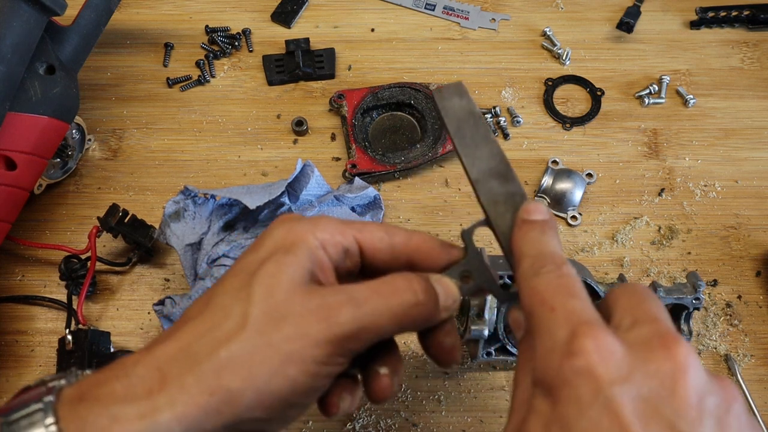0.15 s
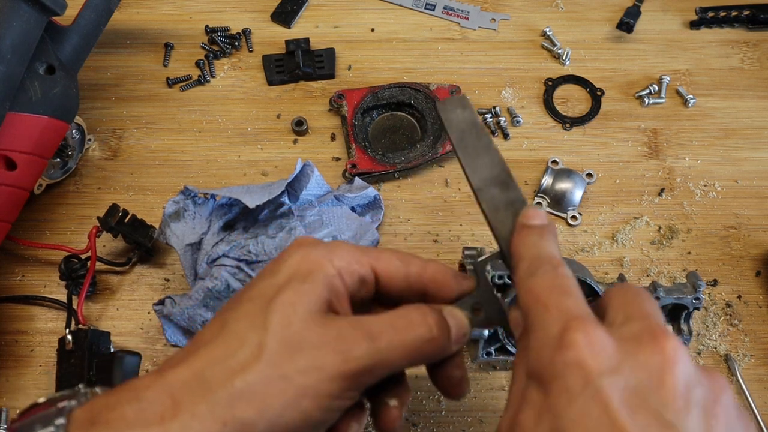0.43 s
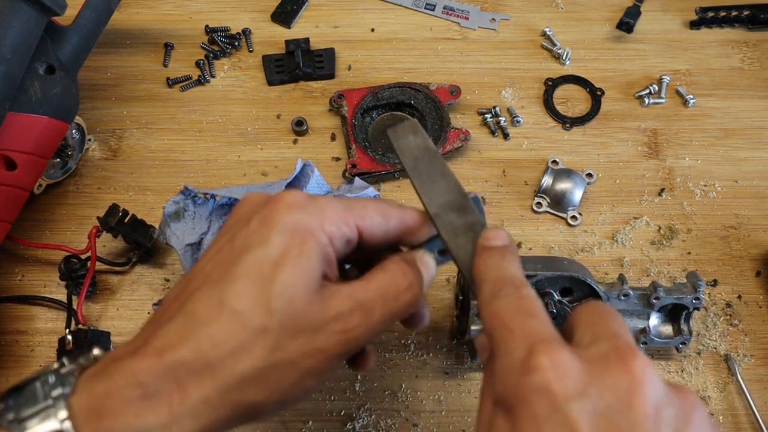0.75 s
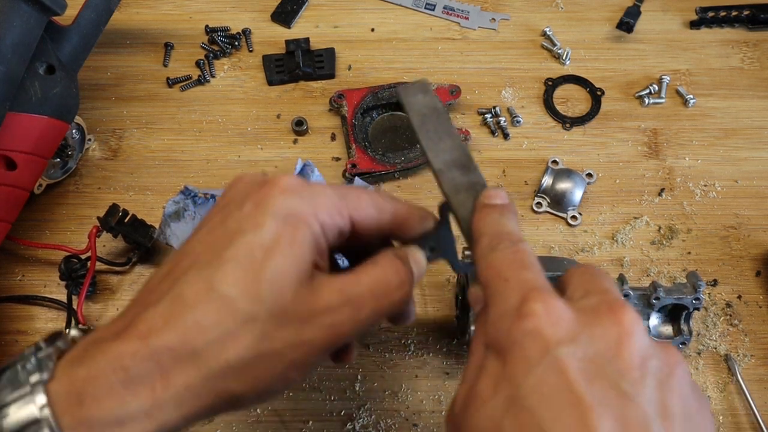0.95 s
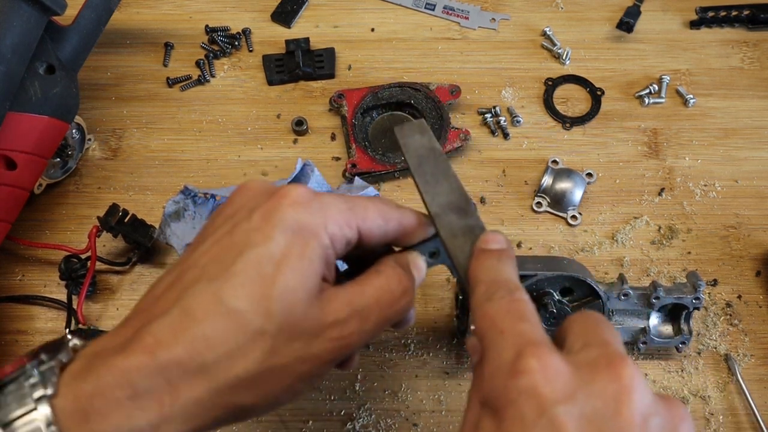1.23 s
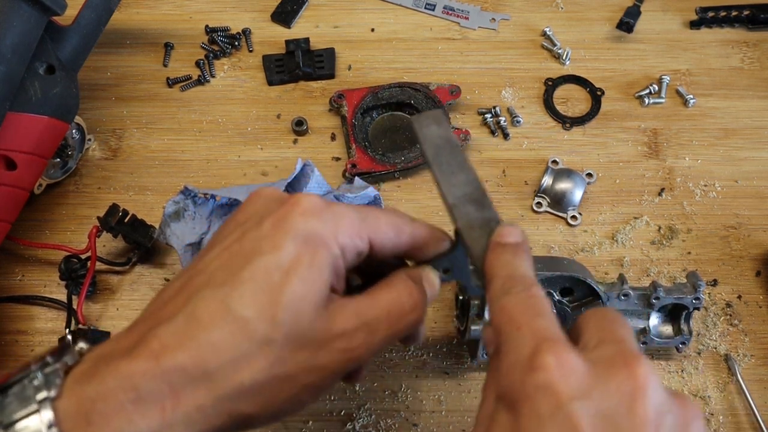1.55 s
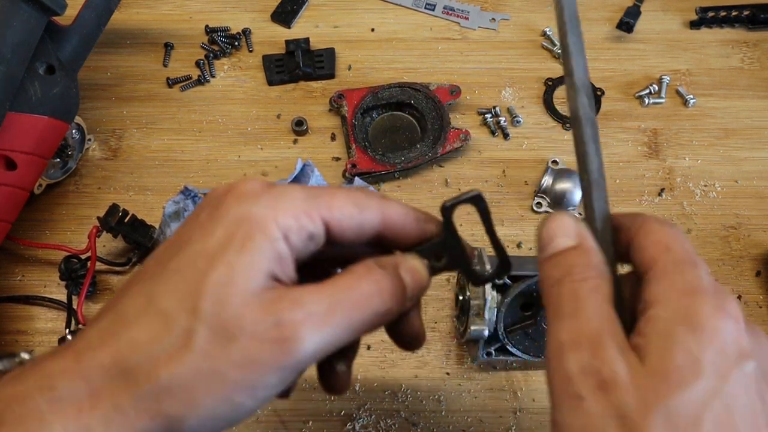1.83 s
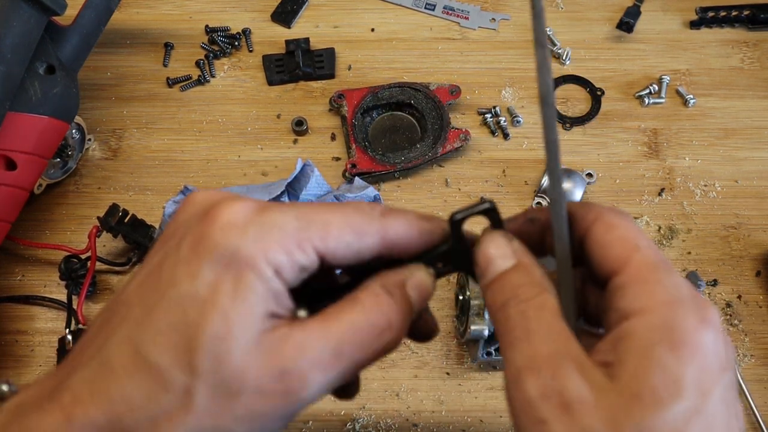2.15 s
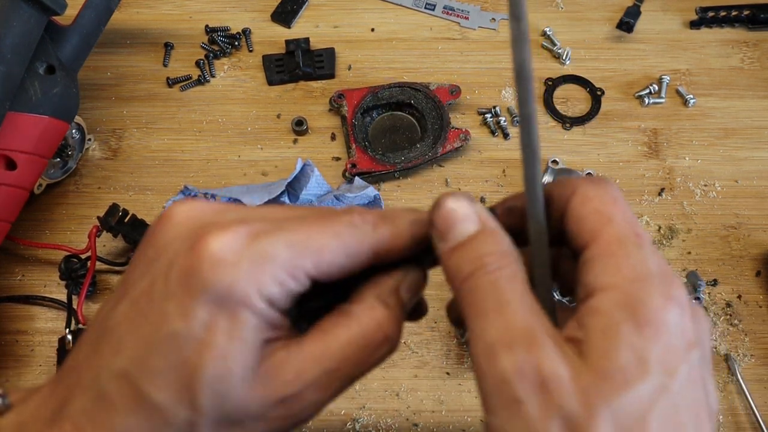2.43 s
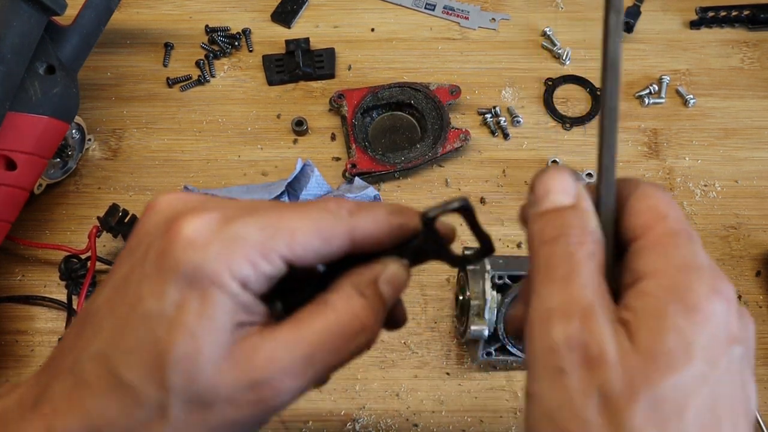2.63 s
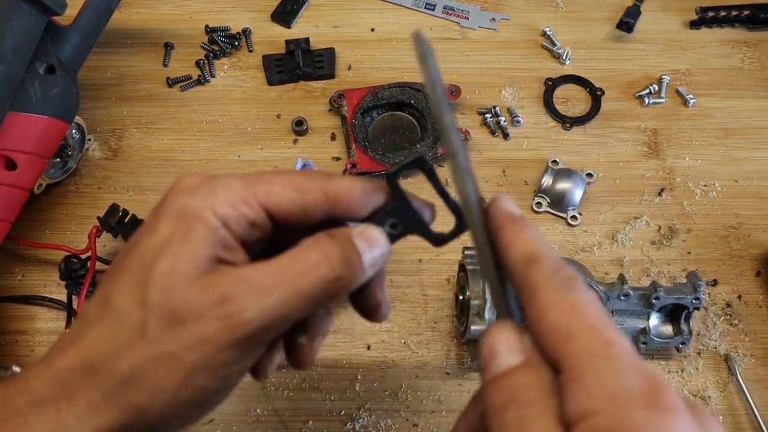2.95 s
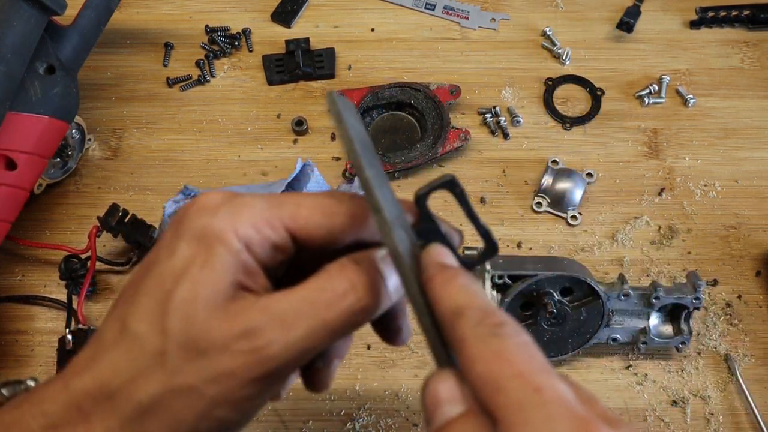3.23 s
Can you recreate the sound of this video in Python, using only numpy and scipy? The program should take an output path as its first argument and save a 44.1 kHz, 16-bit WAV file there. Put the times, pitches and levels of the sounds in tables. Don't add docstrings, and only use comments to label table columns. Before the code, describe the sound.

Close, dry filing at a workbench: about ten quick gritty scrapes with shifting metallic ringing, a small double tap between them, then near silence and a short clicking slide, in a small room.

```python
import sys
import numpy as np
from scipy import signal
from scipy.io import wavfile
from scipy.ndimage import uniform_filter1d

SR = 44100
rng = np.random.default_rng(int(sys.argv[2]) if len(sys.argv) > 2 else 0)


def output_pcm(signal):
    pcm = np.clip(np.atleast_2d(signal).T, -1, 1) * 32767
    wavfile.write(sys.argv[1], SR, np.round(pcm).astype(np.int16))


def boost(x):
    u = np.asarray(x, float) / 20
    return 10 ** u


N = 149940


def evened(x):
    return x / np.sqrt(np.mean(x ** 2) + 1e-20)


def read(points, hz):
    f, value = np.transpose(points)
    return np.interp(np.log(hz + 1), np.log(f + 1), value)


def add(mix, s, sound):
    part = mix[round(s * SR):][:len(sound)]
    part += sound[:len(part)]


def ring(x, hz, width):
    r = np.exp(-np.pi * 1.5 * width / SR)
    turn = 2 * np.pi * min(hz, 0.45 * SR) / SR
    one = [1 - r, 0, r - 1, 1, -2 * r * np.cos(turn), r * r]
    return signal.sosfilt([one, one], x)


def floor():
    # frequency in Hz, density in dB per Hz.
    spectrum = [(15, -14.5), (30, -0.5), (120, 0), (300, -3), (700, -5), (1400, -3), (2000, -12),
                (16000, -16.5)]
    floor_db, patch_db = -55.5, 0.27
    frames, hz = N // 256 + 5, np.fft.rfftfreq(1024, 1 / SR)
    a, b, patches = rng.standard_normal((frames, 513, 3)).T
    patches = uniform_filter1d(patches, 10, 0)
    patches = evened(uniform_filter1d(patches, 14, 1))
    z = (a + 1j * b) * boost(read(spectrum, hz)[:, None] + patch_db * patches)
    hiss = signal.istft(z, nperseg=1024, noverlap=768)[1][:N]
    return boost(floor_db) * evened(hiss)


def room(x):
    # frequency in Hz, t60 in seconds.
    decay = [(300, 0.32), (2000, 0.39), (6000, 0.35), (14000, 0.23)]
    # frequency in Hz, level in dB.
    colour = [(300, -2), (1000, 0), (1800, -2.5), (3500, 1), (6000, -1), (12000, 3.5)]
    echoes = np.zeros(SR)
    at = np.arange(200, SR - 20, 20)
    echoes[at + rng.integers(0, 20, at.shape)] = rng.choice([-1., 1.], at.shape)
    hz, t, z = signal.stft(echoes, SR, nperseg=256)
    gain_db = read(colour, hz)[:, None] - 60 * t / read(decay, hz)[:, None]
    tail = signal.istft(z * boost(gain_db), SR, nperseg=256)[1]
    return signal.fftconvolve(x, tail / np.linalg.norm(tail))[:N]


def bump(s, db, hz, t60):
    t = np.arange(SR // 2) / SR
    wobble = ring(rng.standard_normal(len(t)), hz, 0.3 * hz)
    shape = np.minimum(t / 0.0028, 1) * boost(-60 * t / t60)
    thud = wobble * shape
    return s, boost(db) * thud * np.linalg.norm(shape) / np.linalg.norm(thud)


def all_modes(main, main_db, shapes, body, count):
    body_db, spread_db = -6.5, 3.5
    u = rng.random((count, 3))
    hz = 320 + 15600 * ((np.arange(count) + 0.5 * u[:, 0]) / count) ** 1.5
    db = read(body, hz) + body_db + spread_db * 2 * (u[:, 1] - 0.5)
    strong = np.c_[np.add(main, [0, 0, main_db]), shapes[:len(main)]]
    crowd = np.c_[hz, 60 + np.gradient(hz), db, u[:, 2]]
    return np.r_[strong, crowd]


def contact_bodies():
    # frequency in Hz, width in Hz, level in dB.
    bite = [(1340, 130, -9), (1750, 150, -6), (2450, 150, -3), (2950, 190, -4), (3750, 190, -3),
            (4330, 120, -3), (4830, 140, 0), (6150, 130, -4), (6580, 220, -3), (980, 120, -13),
            (8480, 110, -1), (8990, 130, -5), (9570, 80, -6), (13300, 90, -16)]
    drag = [(1280, 110, -6), (1740, 120, -5), (2200, 120, -1), (3070, 160, -1), (3800, 160, -3),
            (4690, 210, -3), (4290, 96, -4), (6170, 70, -6), (6520, 190, -6), (8200, 160, -10),
            (950, 130, -13), (9000, 100, -13), (9610, 78, -10), (15100, 130, -26)]
    held = [(400, 250, -18), (960, 140, -6), (1830, 300, 3), (2300, 200, -5), (3150, 170, -3),
            (3750, 300, -4), (4250, 260, -3), (5020, 200, -5), (6700, 300, -8), (8700, 500, -10),
            (10260, 250, -14)]
    tipped = [(600, 400, -14), (1650, 400, 5), (3030, 300, -2), (4330, 400, -1), (5090, 300, 1),
              (5750, 250, 0), (6630, 250, -3), (8450, 400, -6)]
    # frequency in Hz, level in dB.
    bite_body = [(330, -29.5), (620, -18.5), (2400, -5.5), (4790, -2.4), (7250, -6), (8700, -2.5),
                 (10800, -16.5), (14200, -17.5)]
    drag_body = [(330, -32.5), (620, -15), (1300, -15.5), (2230, -3), (4790, -7), (8410, -10.5),
                 (10800, -23), (15500, -31)]
    held_body = [(200, -30), (960, -14), (1830, -5), (4240, -3), (8490, -6), (11000, -17), (15800, -28)]
    bite_shape = [0.022, 0.48, 0.16, 0.067, 1, 0.1, 0.2, 0.47, 0.15, 0.37, .75, 0.23, 1, .35]
    drag_shape = [0.56, 0.64, 0.31, 1, 0.05, 0.48, 0.22, 0.4, 0.17, 0.77, 0.56, 0.53, 0.25, .55]
    main_db, loose_db = -5, 1
    return (all_modes(bite, main_db, bite_shape, bite_body, count=50),
            all_modes(drag, main_db, drag_shape, drag_body, count=50),
            all_modes(held, loose_db, bite_shape, held_body, count=40),
            all_modes(tipped, loose_db, bite_shape, held_body, count=40))


def steel(drive, place, tilt_db, modes):
    travel_turns, travel_db = 0.45, 5.5
    sides = np.sign(rng.random((len(drive), len(modes))) - 0.5).T
    out = 0
    for side, (hz, width, db, turns) in zip(sides, modes):
        shape = np.cos(2 * np.pi * (turns + travel_turns * np.sqrt(hz / 1000) * place))
        gain_db = db + travel_db * shape + tilt_db * np.log2(hz / 4000)
        out = out + ring(side * drive * boost(gain_db), hz, width)
    return out


def tap(s, db, tilt_db, modes):
    tap_db, rattle_s = -5, 0.0018
    t = np.arange(3000) / SR
    rattle = np.exp(-t / rattle_s) * (rng.random(len(t)) < 0.12)
    drive = rattle + 2 * (t == 0)
    sound = steel(drive, 0, tilt_db, modes)
    return s, boost(db + tap_db) * sound / np.std(sound[:200])


def sing(drive, t, start, length, hz, db):
    width_hz, sing_db = 135, -2
    swell = np.sin(np.pi * np.clip((t - start) / (1.2 * length) + 1 / 12, 0, 1)) ** 0.5
    sides = np.sign(rng.random(len(t)) - 0.5)
    tone = ring(drive * swell * sides, hz, width_hz)
    return boost(db + sing_db) * tone * np.linalg.norm(swell) / np.linalg.norm(tone)


def stroke(rows, begin, modes):
    # start in seconds,
    # length in seconds, frequency in Hz, level in dB.
    sings = [(0.0, 0.029, 4260, -20.5), (0.0, 0.035, 3010, -24.5), (0.078, 0.046, 5390, -21.5),
             (0.08, 0.075, 3060, -25.5), (0.099, 0.087, 3740, -22.5), (0.119, 0.067, 2440, -23.5),
             (0.119, 0.075, 9560, -19), (0.151, 0.075, 4790, -20.5), (0.293, 0.081, 2200, -29),
             (0.308, 0.073, 3700, -29), (0.351, 0.052, 4270, -25), (0.435, 0.055, 3050, -19),
             (0.454, 0.078, 8490, -17.5), (0.459, 0.058, 990, -28.5), (0.488, 0.049, 6710, -26),
             (0.504, 0.046, 4820, -23), (0.609, 0.046, 4860, -21.5), (0.678, 0.067, 3060, -27.5),
             (1.016, 0.081, 1380, -28.5), (1.02, 0.084, 2500, -19.5), (1.042, 0.049, 6580, -17),
             (1.045, 0.049, 8460, -16), (1.056, 0.049, 9030, -39), (1.068, 0.058, 4860, -21),
             (1.193, 0.078, 3970, -25), (1.205, 0.075, 4730, -23), (1.207, 0.084, 1300, -35),
             (1.216, 0.07, 2200, -21.5), (1.641, 0.049, 8410, -16), (1.64, 0.073, 1770, -24.0),
             (1.646, 0.081, 2750, -19.5), (1.652, 0.07, 5870, -23), (1.658, 0.081, 2490, -25.5),
             (1.66, 0.064, 6680, -30.5), (1.662, 0.081, 2750, -26), (1.666, 0.061, 9000, -24.0),
             (1.672, 0.064, 4790, -19.5), (1.681, 0.046, 3920, -17.5),
             (0.11, .11, 563, -38), (0.268, .07, 590, -33), (0.297, .09, 335, -41.5),
              (0.646, .08, 600, -37.5), (1.013, .12, 563, -35.5), (1.18, .09, 564, -41),
              (1.374, .09, 590, -35), (1.4, .08, 360, -42.5), (1.505, .1, 2330, -23),
              (1.51, .09, 1824, -27), (1.516, .08, 4000, -31), (1.38, .08, 2820, -28.5),
              (1.42, .06, 4150, -26.5)]
    teeth_per_s, tooth_spread_db = 6000, 2.4
    judder_db, judder_s, chatter_db = 1.8, 0.0018, 1.6
    land_s, lift_s = 0.0012, 0.005
    s, press_db, tilt_db = np.transpose(rows)
    first, last = s[0], s[-1]
    u, g = rng.random((9600, 2)), rng.standard_normal((9600, 2))
    t = first + np.arange(9600) / SR
    caught = u[:, 0] < teeth_per_s / SR
    teeth = caught * np.sign(g[:, 0]) * boost(-tooth_spread_db * np.log(u[:, 1] + 0.02))
    span = int(judder_s * SR) + 1
    judder = evened(uniform_filter1d(uniform_filter1d(g[:, 1], span), span))
    landing = np.clip((t - first) / land_s + (first == 0), 0, 1)
    lifting = np.clip((last + lift_s - t) / lift_s, 0, 1)
    place = begin + np.clip((t - first) / (last - first), 0, 1)
    drive = teeth * boost(judder_db * np.minimum(judder, 2)) * landing * lifting
    tilt = np.interp(t, s, tilt_db) + chatter_db * np.clip(judder, -2, 2)
    sound = steel(drive, place, tilt, modes)
    rasp = sound * boost(np.interp(t, s, press_db)) / np.std(sound[t < last])
    song = np.zeros(len(t))
    for start, length, hz, db in sings:
        if first < start + length / 2 < last:
            song += sing(drive, t, start, length, hz, db)
    return first, rasp, song


def scene():
    # time in seconds, pressure in dB, speed brightness in dB per octave.
    pushes = [
        [(0.088, -22, -2), (0.092, -17, -2), (0.174, -14, 0.5), (0.186, -18.5, -0.5), (0.215, -21, 1),
         (0.226, -38.5, -9.5)],
        [(0.444, -28, 0), (0.449, -16, -2), (0.48, -12.5, 0), (0.525, -11.5, 0.5), (0.538, -18, -2.5),
         (0.575, -38, 0)],
        [(1.009, -18, -2), (1.075, -12.5, -0.5), (1.133, -23, -1.5), (1.15, -61, -16.5)],
        [(1.374, -10, -2), (1.382, -14.5, -2.5), (1.402, -19, -1.5), (1.454, -18, -1), (1.485, -38.5, -0.5)],
        [(1.653, -9.5, -1), (1.705, -14.5, -1.5), (1.729, -11.5, 0), (1.737, -31.5, 4.5)],
    ]
    pulls = [
        [(0.0, -11.5, 2), (0.016, -20, 0), (0.03, -31.5, 0.5), (0.08, -42, -4)],
        [(0.275, -17.5, -3.5), (0.281, -16.5, 2), (0.361, -16.5, -1.5), (0.387, -21.5, -1), (0.393, -37, -10.5)],
        [(0.595, -30.5, -3.5), (0.637, -17, 0.5), (0.719, -20.5, -1.5), (0.735, -37, 1.5)],
        [(1.176, -25, -3), (1.244, -17, -0.5), (1.296, -21, -2.5), (1.31, -53, -3)],
        [(1.507, -18, -2.5), (1.512, -21.5, -1.5), (1.594, -23, -1.5), (1.603, -36, -2)],
    ]
    slides = [
        [(2.55, -69, 0), (2.578, -47.5, 5.5), (2.595, -57, 0), (2.674, -57.5, 4.5), (2.73, -79, 2.5)],
        [(3.14, -29, -2), (3.165, -39.5, -4), (3.2, -40, -2), (3.22, -38.5, -6.5), (3.226, -27.5, -1.5),
         (3.246, -33.5, 2.5), (3.252, -38, -8)],
    ]
    push_from = [0.037, 0.86, 0.04, 0.073, 0.15]
    pull_from = [1, 1, 0.23, 0.087, 0.23, 0.11, 0.049]
    # time in seconds, level in dB, brightness in dB per octave.
    taps = [
        (.7821, -17, 0),
        (.7878, -15, 0),
        (.815, -21, -1),
        (3.1338, -19, -2),
        (3.1375, -24, -2),
        (3.2296, -21, 0),
        (3.2385, -20, 0),
    ]
    # time in seconds, level in dB, frequency in Hz, t60 in seconds.
    bumps = [
        (.385, -46, 211, .25),
        (.385, -50.5, 110, .25),
        (.914, -45, 170, .1),
        (.914, -42, 1497, .04),
        (1.12, -56.5, 55, .4),
        (1.24, -44, 144.8, .9),
        (1.39, -49, 89.8, .3),
        (2.8, -48, 165, .12),
        (2.85, -59, 197.5, .5),
    ]
    room_db, sing_room_db = -10, -10
    bite, drag, held, tipped = contact_bodies()
    near, songs, air = np.zeros(N), np.zeros(N), floor()
    bodies = len(pushes) * [bite] + len(pulls) * [drag] + len(slides) * [held]
    for rows, begin, modes in zip(pushes + pulls + slides, push_from + pull_from, bodies):
        s, rasp, song = stroke(rows, begin, modes)
        add(near, s, rasp)
        add(songs, s, song)
    for row in taps:
        add(near, *tap(*row, held if row[0] > 2 else tipped))
    for row in bumps:
        add(near, *bump(*row))
    reverberant = room(near + boost(sing_room_db) * songs)
    return (near + songs + boost(room_db) * reverberant + air)[None]


def roll_off(x):
    return signal.sosfilt(signal.butter(12, 16520, fs=SR, output="sos"), x)


def record(dry):
    lowpass = signal.firwin(511, 15650, window=("kaiser", 8), fs=SR)
    cut = signal.oaconvolve(dry, lowpass[None], "same")
    return roll_off(np.clip(cut, -1, 1))


dry = scene()
out = record(dry)
output_pcm(out)
```